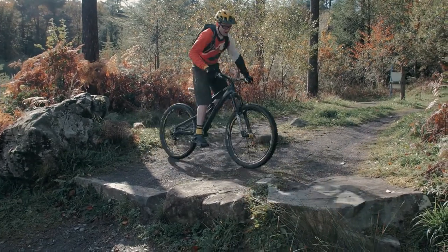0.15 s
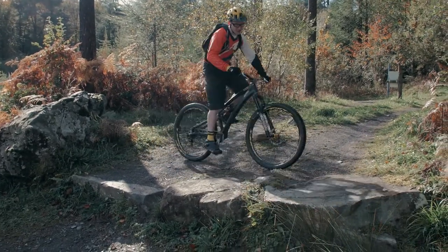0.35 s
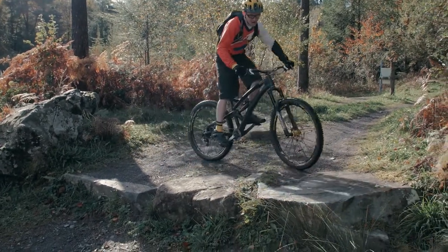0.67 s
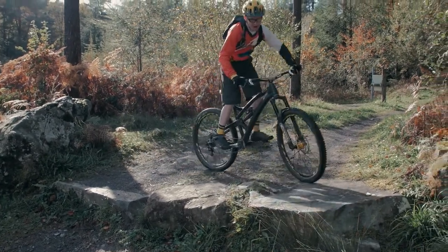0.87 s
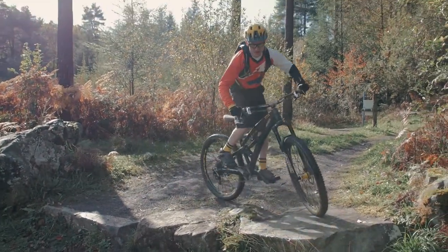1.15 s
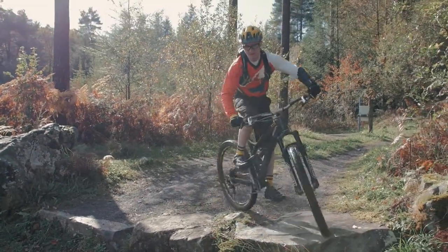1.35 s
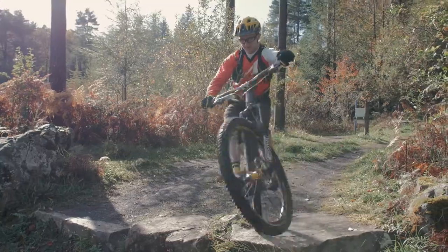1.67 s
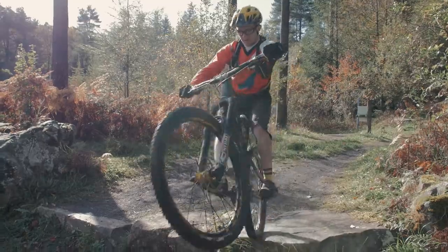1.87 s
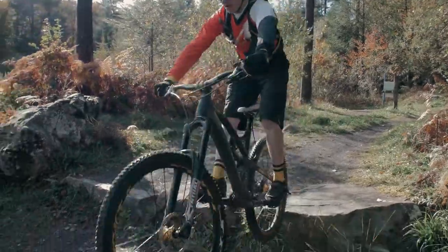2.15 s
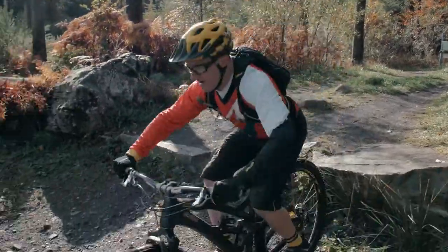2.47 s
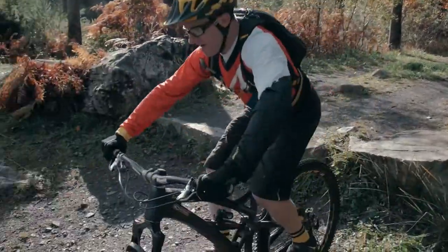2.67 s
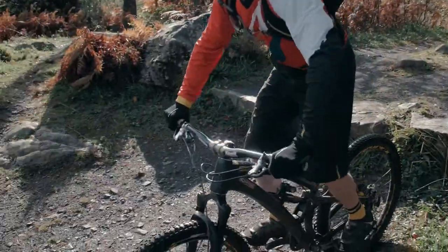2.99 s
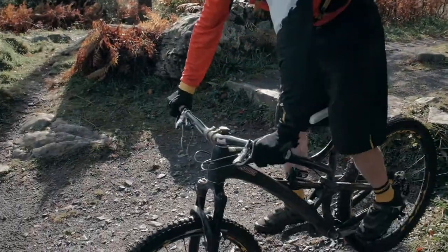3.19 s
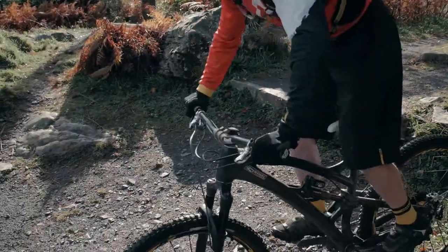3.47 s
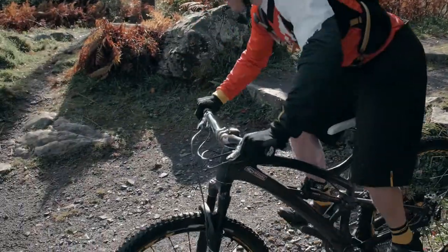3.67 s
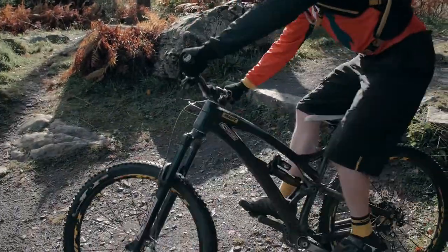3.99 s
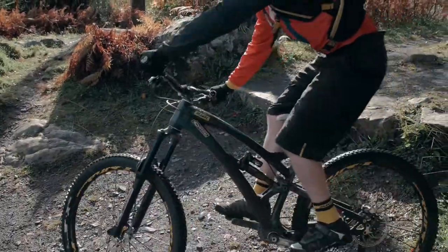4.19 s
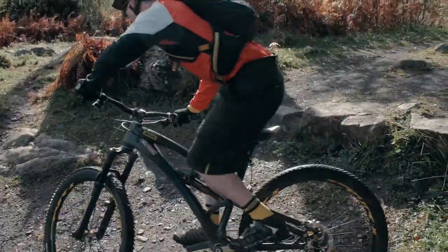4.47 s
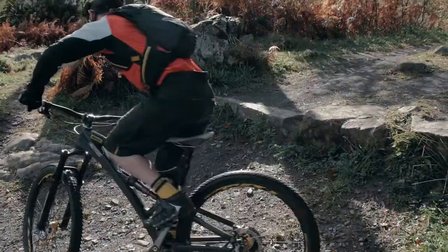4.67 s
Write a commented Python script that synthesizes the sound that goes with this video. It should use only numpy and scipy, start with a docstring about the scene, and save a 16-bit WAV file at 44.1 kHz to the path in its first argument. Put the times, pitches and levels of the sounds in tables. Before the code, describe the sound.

A mountain bike creeps over stone, thuds down a drop and squeals its brakes, with chain clacks, hub ticks and crunching gravel.

```python
"""On a stone slab in the woods, a mountain bike creeps to the ledge, drops off and lands close by.
The tyres thud and the chain slaps. The disc brakes honk as their pads stick and slip on the discs,
the chain clacks as the rider balances on the pedals, and the shaken spokes ring on.
The coasting rear hub ticks, tyres crunch over grit and gravel, and light wind rumbles at the microphone."""
import sys
import numpy as np
from scipy import signal
from scipy.fft import rfft, irfft
from scipy.io import wavfile
from scipy.ndimage import uniform_filter1d

SR = 44100
rng = np.random.default_rng(int(sys.argv[2]) if len(sys.argv) > 2 else 0)


def pcm_store(signal):
    """Save signal as 16-bit PCM."""
    levels = np.round(np.clip(np.atleast_2d(signal), -1, 1) * 32767)
    wavfile.write(sys.argv[1], SR, levels.astype(np.int16).T)


N = 213175
TIME = np.arange(N) / SR
HIT_TIME = TIME[:SR // 5]


def undb(db):
    """Turn decibels into a number to multiply by."""
    return 10 ** (np.asarray(db) / 20)


def unit(x):
    """Scale a sound to an average power of 1."""
    return x / np.sqrt(np.mean(x ** 2) + 1e-18)


def curves(table):
    """Join a table's rows with straight lines over time, giving one curve for each value column."""
    times, *columns = np.transpose(table)
    return [np.interp(TIME, times, column) for column in columns]


def gain_at(hz, points):
    """Look up how strong a tone colour is at the given frequencies."""
    point_hz, db = np.transpose(points)
    return undb(np.interp(np.log(np.maximum(hz, 1)), np.log(point_hz), db))


def colour(x, points, size=8192):
    """Filter a sound to give it a tone colour, listed as pairs of frequency in Hz and level in dB."""
    gains = gain_at(np.arange(size // 2 + 1) * SR / size, points)
    cepstrum = irfft(np.log(gains))
    # keeping only the first half means the filter never answers before the sound arrives
    cepstrum[1:size // 2] *= 2
    cepstrum[size // 2 + 1:] = 0
    return signal.fftconvolve(x, irfft(np.exp(rfft(cepstrum))))[:len(x)]


def noise(size, points):
    """A steady hiss with the given tone colour."""
    return unit(colour(rng.standard_normal(size), points))


def wobble(rate, size=N):
    """A smooth random curve, about 1 either way, that takes a new value `rate` times a second."""
    hold = max(int(SR / rate), 2)
    steps = np.repeat(rng.standard_normal(N // hold + 1), hold)
    return unit(uniform_filter1d(uniform_filter1d(steps, hold), hold))[:size]


def fade(t, t60):
    """Die away by 60 dB in t60 seconds, the fade time."""
    return np.exp(-np.log(1000) * t / t60)


def ring(tones, t, ratio=1, wave=np.sin):
    """A struck object rings with several tones, each fading at its own pace."""
    return sum(undb(db) * fade(t, t60) * wave(2 * np.pi * hz * ratio * t) for hz, db, t60 in tones)


def add(out, start, sound):
    """Mix a sound in at a start time in seconds."""
    i = int(start * SR)
    out[i:i + len(sound)] += sound[:N - i]


# The tone colour of the wind. Each row: frequency in Hz, relative level in dB.
WIND_COLOUR = [(15, 15.5), (28, 19), (50, 7.5), (90, 3), (200, -7.5), (600, -7.5), (2000, -41), (8000, -18),
               (16000, -26)]

def wind(gust_db=3.0):
    """Light wind rumbles on the microphone over the hush of the wood."""
    return noise(N, WIND_COLOUR) * undb(-57 + gust_db * wobble(10))


def woodland_echo(sound, echo_db=-25, t60=0.36):
    """Trunks and rock scatter back a thin, dull echo."""
    t = TIME[:SR]
    dull = noise(SR, [(150, 1), (600, -3.5), (1500, -4.5), (4000, -15), (12000, -36)])
    tail = dull * fade(t, t60) * (1 - np.exp(-t / 0.0013))
    return undb(echo_db) * signal.fftconvolve(sound, tail / np.linalg.norm(tail))[:N]


# Steady rolling. Each row: time in seconds, then relative levels in dB of tyre rumble and of grit.
ROLLING = [(0, -57.5, -47), (0.18, -64, -50.5), (0.3, -58, -44), (0.6, -67.5, -47.5), (0.85, -61, -44.5),
           (0.95, -68, -52.5), (1.22, -69.5, -50.5), (1.42, -56.5, -48), (1.56, -60.5, -53.5),
           (1.82, -64.5, -43), (2.0, -61.5, -58), (2.34, -54.5, -56.5), (2.83, -54, -54),
           (3.28, -62.5, -48.5), (3.36, -56, -54.5), (3.52, -66, -40.5), (3.62, -74, -52), (3.8, -53, -38),
           (3.96, -48.5, -55.5), (4.25, -58, -58), (4.5, -55.5, -42), (4.83, -49.5, -42.5)]
# Scuffs and skids. Each row: start and length in seconds, relative grinding, grit and rumble in dB.
SKIDS = [(1.596, 0.059, -49, -44.5, -56), (1.87, 0.017, -44.5, -47, -51), (2.047, 0.027, -48, -45, -71),
         (2.379, 0.065, -27.5, -36.5, -34), (2.452, 0.3, -31.5, -38.5, -49), (2.69, 0.017, -21.5, -32, -44),
         (2.723, 0.021, -35, -36, -61), (2.763, 0.024, -35, -40.5, -59), (2.861, 0.031, -46, -44, -63),
         (3.087, 0.027, -32, -49, -43.5), (3.725, 0.023, -46, -45, -39), (3.795, 0.063, -36, -38.5, -41.5),
         (3.873, 0.028, -42, -55, -44), (4.302, 0.045, -40, -52, -40), (4.722, 0.048, -43.5, -36.5, -46.5)]

def tyre_strengths(grit_share=0.64, attack_s=0.0087, t60=0.072):
    """How strongly the tyres grind, crunch and rumble: rolling, plus skids that bite, hold and fade."""
    rumble_db, grit_db = curves(ROLLING)
    grind_db = grit_share * grit_db + (1 - grit_share) * rumble_db + 3.5
    powers = undb([grind_db, grit_db, rumble_db]) ** 2
    t = TIME[:SR // 2]
    for start, length, *levels_db in SKIDS:
        shape = np.minimum(t / attack_s, 1) * fade(np.maximum(t - length, 0), t60)
        for power, db in zip(powers, levels_db):
            add(power, start, (undb(db) * shape) ** 2)
    return np.sqrt(powers)


def crunch(per_second, spread_db, hiss_db):
    """Many tiny grains break, some far louder than others, over a smooth rubbing hiss."""
    sizes = undb(spread_db * np.minimum(rng.exponential(size=N), 5))
    grains = (rng.random(N) < per_second / SR) * sizes * rng.choice([-1, 1], N)
    return unit(unit(grains) + undb(hiss_db) * rng.standard_normal(N))


# Four tone colours of tyres on the ground. Each row: frequency in Hz, relative level in dB.
RUMBLE_COLOUR = [(25, -22), (70, -8), (150, 1.5), (300, 1), (450, 4), (800, -36)]
GRIND_COLOUR = [(200, -31), (450, -3.5), (800, -0.5), (1300, -0.5), (1900, -4.5), (3000, -20)]
FAR_GRIT_COLOUR = [(1200, -12.5), (2100, -2), (3500, 1.5), (4800, -5.5), (6500, -19.5), (9000, -15.5),
                   (16000, -6)]
NEAR_GRIT_COLOUR = [(1200, -16), (2100, -1.5), (4000, -1), (6500, -8), (9000, -1.5), (16000, -18)]
# The bike comes closer. Each row: time in seconds, share of the near grit colour from 0 to 1.
APPROACH = [(0, 0.32), (1.1, 0.66), (1.4, 0.93), (4.83, 0.98)]

def tyres(knob_db=1.92, ground_db=0.92, bump_db=2.5):
    """Knobbly tyres rumble, grind and crush grit on uneven ground; the grit brightens as they near."""
    grind_gain, grit_gain, rumble_gain = tyre_strengths()
    near = curves(APPROACH)[0]
    uneven_db = knob_db * wobble(90) + ground_db * wobble(25)
    rumble = noise(N, RUMBLE_COLOUR) * rumble_gain * undb(bump_db * wobble(30) - 3.5)
    coarse = crunch(per_second=1500, spread_db=4.5, hiss_db=-1.5)
    grind = unit(colour(coarse, GRIND_COLOUR)) * grind_gain * undb(uneven_db - 1.7)
    fine = crunch(per_second=2200, spread_db=5.0, hiss_db=1.0)
    far_grit = np.sqrt(1 - near) * unit(colour(fine, FAR_GRIT_COLOUR))
    near_grit = np.sqrt(near) * unit(colour(fine, NEAR_GRIT_COLOUR))
    return rumble + grind + (far_grit + near_grit) * grit_gain * undb(uneven_db - 2.5)


# The larger stones. Each row: start in seconds, peak level in dB, pitch in Hz.
BIG_STONES = [(0.5155, -20, 2820), (0.5652, -28, 3620), (0.6585, -28.5, 3180), (0.8428, -25, 2140),
              (1.348, -20.5, 3800), (1.414, -27, 5500), (1.473, -30, 1840), (1.526, -27.5, 4070),
              (1.7377, -18.5, 3400), (1.8797, -21.5, 1120), (1.9155, -25.5, 1960), (2.055, -27.5, 3520),
              (2.137, -25, 1450), (2.1653, -28.5, 3840), (2.637, -15, 1650), (3.738, -24.5, 2050),
              (4.74, -19.5, 2620)]

def stones(pebbles_per_s=12, pebble_hz=2440, spread_octaves=0.69, t60=0.0065, ring_db=-8):
    """Stones snap out from under the tyres, each a dry crack with a trace of pitch."""
    out, t = np.zeros(N), HIT_TIME[:1024]
    grit_db = curves(ROLLING)[1]
    # small pebbles come at random, louder where the grit is louder
    pebbles = []
    for i in np.flatnonzero(rng.random(N) < pebbles_per_s / SR):
        db = grit_db[i] + 11.5 - 2.5 * rng.standard_normal()
        hz = pebble_hz * 2 ** (spread_octaves * rng.standard_normal())
        pebbles.append((TIME[i], db, hz))
    for start, db, hz in BIG_STONES + pebbles:
        crack = noise(len(t), [(hz / 4, -14), (hz, 0), (hz * 4, -13)])
        snap = (undb(ring_db) * np.cos(2 * np.pi * hz * t) + crack) * fade(t, t60)
        add(out, start, undb(db) * snap / np.abs(snap).max())
    return out


# The tone colour of a hub tick. Each row: frequency in Hz, relative level in dB.
TICK_COLOUR = [(1500, 6), (4000, -4), (8000, -0.5), (11000, 3.5), (13500, 6), (16000, -4)]
# Spells of coasting. Each row: start, length and gap between ticks in seconds, relative level in dB.
COASTING = [(1.2383, 0.015, 0.035, -40), (1.927, 0.095, 0.043, -42.5), (2.052, 0.2, 0.028, -41),
            (3.601, 0.13, 0.038, -36), (4.0205, 0.015, 0.043, -36.5)]

def hub_ticks(t60=0.081, gain_db=-1, scatter_db=1.0):
    """Small catches in the rear hub drop over ratchet teeth at an even pace, with thin, bright ticks."""
    out, t = np.zeros(N), HIT_TIME
    shape = fade(t, t60) * (1 - np.exp(-t / 0.00076))
    for start, length, gap, db in COASTING:
        for when in np.arange(start, start + length, gap):
            tick = noise(len(t), TICK_COLOUR) * shape
            add(out, when, undb(db + gain_db - scatter_db * rng.standard_normal()) * tick)
    return out


# One squeak of the chain. Each row: time in seconds, pitch in Hz and level in dB of its lower tone.
SQUEAK_PATH = [(3.852, 3650, -75), (3.860, 3810, -29.5), (3.868, 4440, -42), (3.877, 4350, -34),
               (3.886, 4280, -44), (3.895, 4150, -39), (3.905, 3960, -75)]

def chain_squeak(jitter=0.0247, upper_ratio=1.3, upper_db=-3):
    """Steel links slide across a cog and make two unsteady, clashing tones."""
    hz, db = curves(SQUEAK_PATH)
    on = (TIME > SQUEAK_PATH[0][0]) & (TIME < SQUEAK_PATH[-1][0])
    pitches = [hz * ratio * (1 + jitter * wobble(1200)) for ratio in (1, upper_ratio)]
    lower, upper = (np.sin(2 * np.pi * np.cumsum(pitch) / SR) for pitch in pitches)
    return on * undb(db) * (lower + undb(upper_db) * upper)


# The tones of the front wheel (spokes and brake disc), the rear disc and the rear spokes.
# Each row: pitch in Hz, relative level in dB, fade time in seconds.
FRONT_WHEEL_TONES = [(490, -7.5, 1.76), (514, -3.5, 0.52), (541, -3.5, 1.2), (738, -8, 1.66),
                     (1106, -3.5, 0.9), (1123, 5, 0.39), (1185, -4, 0.5), (1226, -14, 0.75),
                     (1690, -10, 0.48), (2570, -6, 0.3)]
REAR_DISC_TONES = [(796, -3.5, 0.78), (820, 3, 0.45), (1510, -12, 0.34), (1536, -8.5, 0.26)]
REAR_SPOKE_TONES = [(471, 3, 1), (504, -2.5, 0.93), (827, -22, 0.32), (1250, -6, 0.36), (1377, -4.5, 0.52)]

def ringing_wheels(front_honks, rear_honks, blows):
    """Spokes and brake discs ring on after honks and blows shake them."""
    front, rear, spokes = undb(-67.5) * front_honks, undb(-61) * rear_honks, undb(-60) * blows
    # each wheel gets one extra kick as its pads let go
    add(front, start=2.70, sound=undb([-34.5]))
    add(rear, start=4.38, sound=undb([-35.5]))
    parts = (front, FRONT_WHEEL_TONES), (rear, REAR_DISC_TONES), (spokes, REAR_SPOKE_TONES)
    return sum(signal.fftconvolve(shake, ring(tones, TIME[:SR]))[:N] for shake, tones in parts)


# The tones of the bike's frame. Each row: pitch in Hz, relative level in dB, fade time in seconds.
FRAME_TONES = [(215.5, -11, 0.045), (423, -34, .04), (910, -10.5, 0.054), (996, 2, 0.022),
               (1248, 1.5, 0.021), (1497, 4, 0.038), (1510, -56, 0.047), (2400, -5, 0.023),
               (2910, -19, 0.13), (4150, -22, 0.058)]
# The tone colour of steel hitting steel. Each row: frequency in Hz, relative level in dB.
STEEL_COLOUR = [(400, -56), (1200, 9.5), (2200, -0.5), (3000, 4.5), (4500, -6.5), (6500, -8), (8700, 5),
                (12000, -5), (16000, -9)]
# Clacks and slaps of the chain. Each row: start in seconds, relative level in dB,
# a number that multiplies the frame's pitches, extra level of the steel crack in dB.
CHAIN_HITS = [(2.419, -4, 1.1, 0), (2.9763, -7, 0.94, -4.5), (3.0861, -5, 0.96, 4), (3.5563, -2, 0.97, 1),
              (3.5590, -15, 0.985, -3), (3.7819, -1, 0.98, 7.5), (3.8593, -18, 0.95, -13)]

def chain_clacks(touch_db=-11, touch_s=0.001006, crack_db=-15, rattle_db=-28, bass_cut_hz=620):
    """The chain touches, then snaps tight: the frame knocks, steel cracks and loose parts rattle."""
    out, t = np.zeros(N), HIT_TIME
    # thin tubes give off little bass
    tubes = signal.butter(3, bass_cut_hz, "high", fs=SR, output="sos")
    for start, db, ratio, steel_db in CHAIN_HITS:
        frame = ring(FRAME_TONES, t, ratio, wave=np.cos)
        knock = signal.sosfilt(tubes, frame) + undb(-11.5) * frame
        knock = signal.lfilter([.3], [1, -.7], knock)  # softened, as the contact takes a moment
        knock /= np.abs(knock).max()
        crack = noise(len(t), STEEL_COLOUR) * fade(t, t60=0.026) * undb(crack_db + steel_db)
        rattle = noise(len(t), GRIND_COLOUR) * fade(t, t60=0.2) * undb(rattle_db)
        add(out, start - touch_s, undb(db + touch_db) * knock)
        add(out, start, undb(db) * (undb(-1) * knock + crack + rattle))
    return out


# The tones of tyre and rim. Each row: pitch in Hz, relative level in dB, fade time in seconds.
TYRE_TONES = [(69.4, -31, 0.11), (106, -31.5, 0.14), (200, -14, 0.02), (274, -11.5, 0.021),
              (513, -7, 0.024), (617, -4.5, 0.019), (855, -5.5, 0.0079), (1450, -4, 0.021),
              (2070, -3, 0.016)]
# Blunt blows on the tyres, and one dull, longer thump at 4.317 s. Each row: start in seconds, level in dB,
# contact time in milliseconds.
BLUNT_HITS = [(2.2860, -32, .7), (2.3910, -15, 0.59), (2.3944, -1, 0.4), (2.3979, -10, 0.43),
              (2.404, -28, 3.4), (2.683, -21.5, 0.43), (3.189, -26.5, 0.98), (3.8352, -22, 0.41),
              (3.8496, -19.5, 0.35), (4.022, -28, 0.86), (4.1254, -20, 0.37), (4.1356, -22.5, 0.47),
              (4.1457, -25, 0.41), (4.311, -19.5, 0.31), (4.317, -31, 8.2), (4.742, -38, 4.8)]

def thuds(slap_db=-27, slap_t60=0.041):
    """Blunt blows: one rounded push shakes rubber and rim, with a slap of loose grit."""
    out, t = np.zeros(N), HIT_TIME
    for start, db, contact_ms in BLUNT_HITS:
        push = np.sin(np.pi * np.minimum(t * 1000 / contact_ms, 1)) ** 2
        body = signal.fftconvolve(push, ring(TYRE_TONES, t, wave=np.cos))[:len(t)]
        slap = noise(len(t), NEAR_GRIT_COLOUR) * fade(t, slap_t60)
        add(out, start, undb(db) * (body / np.abs(body).max() + undb(slap_db) * slap))
    return out


# The tone colour of a brake's high rasp. Each row: frequency in Hz, relative level in dB.
RASP_COLOUR = [(1800, 20), (2350, 5.5), (2950, 0.5), (3550, 3), (4150, -3), (5200, -7), (6500, -14),
               (8500, -8), (10500, -36), (16000, -22)]

def honk(hz, disc_db, low_db, first_db, rasp_db, jitter, flutter_db, disc_hz=1650, rub_db=-6.5):
    """A pad sticks and slips on the disc hz times a second, making a stack of tones and a hiss."""
    size = len(hz)
    # uneven grip makes the pitch shiver
    shiver = jitter * (wobble(259.8, size) + 0.56 * wobble(900, size))
    phase = 2 * np.pi * np.cumsum(hz * (1 + shiver)) / SR
    # the tones are multiples of the pitch; the one nearest the disc's own note stands out
    multiples = np.arange(1, 21)
    disc_multiple = round(disc_hz / hz.mean())
    lows = undb(first_db * (multiples[:disc_multiple - 1] == 1))
    highs = gain_at(multiples[disc_multiple:] * hz.mean(), RASP_COLOUR)
    gains = [low * undb(low_db) for low in lows / np.linalg.norm(lows)] + [undb(disc_db)]
    gains += [high * undb(rasp_db) for high in highs / np.linalg.norm(highs)]
    # each tone flutters in level on its own, the disc tone least
    flutters = np.resize(wobble(110), (len(multiples), size))
    tone = np.zeros(size)
    for k, gain, flutter in zip(multiples, gains, flutters):
        depth_db = flutter_db * (.25 if k == disc_multiple else 1)
        tone += gain * undb(depth_db * flutter) * np.sin(k * phase)
    slips = rng.standard_normal(size) * (1 + np.cos(phase))
    rub = unit(colour(slips, [(400, -22)] + RASP_COLOUR))
    return np.sqrt(2) * tone + undb(rasp_db + rub_db) * rub


def pad_grip(t, attack_s, release_s):
    """The grip of the brake pads builds, holds and lets go."""
    rise = np.sin(np.pi / 2 * np.clip(t / attack_s, 0, 1))
    fall = np.sin(np.pi / 2 * np.clip((t[-1] - t) / release_s, 0, 1))
    return rise * fall


def brake_taps(table, flutter_db):
    """Taps on a lever make short honks: the pitch bends in one arc while the disc tone weakens."""
    out = np.zeros(N)
    for start, length, start_hz, mid_hz, end_hz, db, sag_db, low_db, first_db, jitter in table:
        t = TIME[:int(length * SR)]
        arc = np.polyfit([0, .5, 1], [start_hz, mid_hz, end_hz], 2)
        hz = np.polyval(arc, t / length)
        disc_db = db - sag_db * t / length
        rasp_db = disc_db - 11.5
        tone = honk(hz, disc_db, low_db, first_db, rasp_db, jitter, flutter_db)
        add(out, start, tone * pad_grip(t, attack_s=0.025, release_s=0.016))
    return out


# Taps on the rear brake. Each row: start and length in seconds, pitch in Hz at the start, middle and
# end, disc tone level in dB, its drop during the tap in dB, level of the low tones in dB,
# first low tone over the second (if there is one) in dB, shiver as a share of the pitch.
REAR_TAPS = [(4.229, 0.0697, 760, 726.5, 722, -23, 10, -34, 0, 0.0071),
             (4.331, 0.058, 738, 744.5, 797, -25.5, 1, -37.5, 0, 0.0065)]

def rear_brake():
    """Two light taps on the lever make the rear disc sing cleanly."""
    return brake_taps(REAR_TAPS, flutter_db=5.0)


# Taps on the front brake. Each row reads like a row of REAR_TAPS.
FRONT_TAPS = [(0.456, 0.078, 593, 601, 670, -22, 20, -37.5, 5.5, 0.0081),
              (2.988, 0.07, 585, 579.6, 530, -35.5, 3.5, -39.5, -1, 0.022),
              (4.274, 0.0312, 547, 546, 524, -38, 6, -32.5, 10, 0.02)]
# The long honk after the drop. Each row: time in seconds, pitch in Hz, disc tone level in dB.
LONG_HONK = [(2.44, 506.4, -21.5), (2.498, 570.3, -19.5), (2.511, 597.7, -12.5), (2.523, 586.6, -15),
             (2.555, 584, -17), (2.578, 582.7, -29), (2.624, 585.7, -18.5), (2.658, 569.6, -18.5),
             (2.70, 546, -39)]

def front_brake(swell_hz=1112, swell_width_hz=18, swell_db=5):
    """The front pads stick and slip in a hard, rough honk after the drop, with weak taps either side."""
    out = brake_taps(FRONT_TAPS, flutter_db=4.0)
    start, end = LONG_HONK[0][0], LONG_HONK[-1][0]
    on = (TIME >= start) & (TIME < end)
    hz, disc_db = (curve[on] for curve in curves(LONG_HONK))
    # the low tones swell when twice the pitch crosses a lower note of the disc
    low_db = -27 + swell_db * np.exp(-((2 * hz - swell_hz) / swell_width_hz) ** 2)
    tone = honk(hz, disc_db, low_db, first_db=-4.5, rasp_db=-34, jitter=0.0099, flutter_db=4.0)
    grip = pad_grip(TIME[on] - start, attack_s=0.06, release_s=0.033)
    add(out, start, tone * np.sqrt(grip))
    return out


def scene():
    """Brakes and blows shake the wheels; the whole bike echoes in the wood, over the wind."""
    breeze, rolling = wind(), tyres()
    front, rear = front_brake(), rear_brake()
    blows = chain_clacks() + thuds()
    wheels = ringing_wheels(front, rear, blows)
    bike = front + rear + blows + wheels + rolling + chain_squeak() + hub_ticks() + stones()
    return (bike + woodland_echo(bike) + breeze)[None]


# The tone colour of the microphone. Each row: frequency in Hz, gain in dB.
MIC_COLOUR = [(20, -0.5), (6000, 1.5), (7200, -1.5), (8800, -2), (9800, -11.5), (12500, -5.5),
              (15500, -12.5)]

def record(dry, top_hz=16100):
    """The microphone lifts the lower treble a little; too-loud peaks are clipped and the top is cut."""
    heard = np.clip(colour(dry[0], MIC_COLOUR), -1, 1)
    top_cut = signal.ellip(10, .2, 80, top_hz, fs=SR, output="sos")
    return signal.sosfilt(top_cut, heard)[None]


dry = scene()
out = record(dry)
pcm_store(out)
```